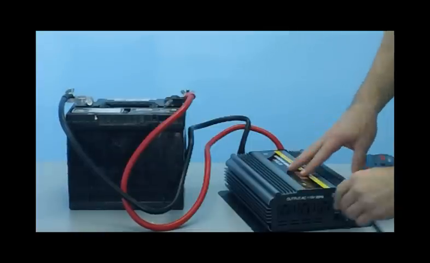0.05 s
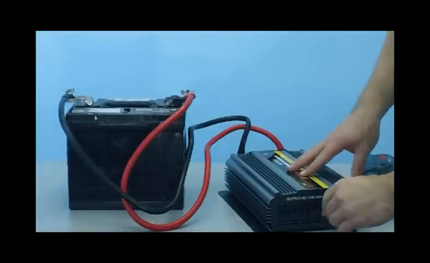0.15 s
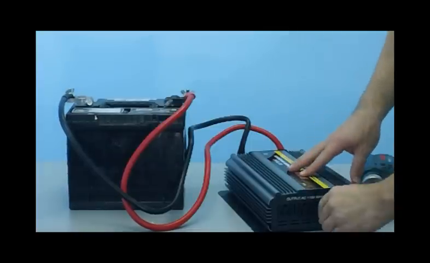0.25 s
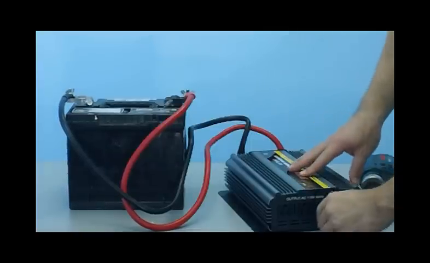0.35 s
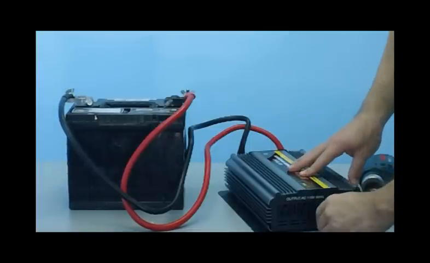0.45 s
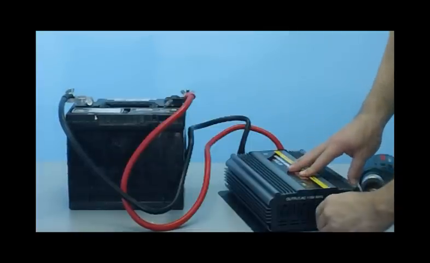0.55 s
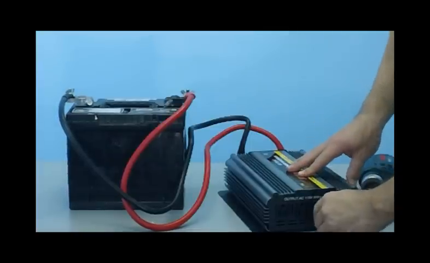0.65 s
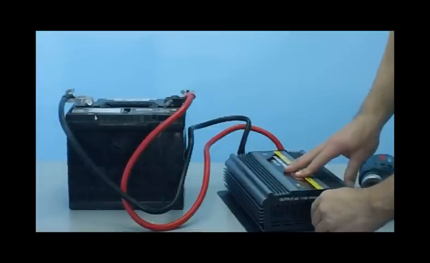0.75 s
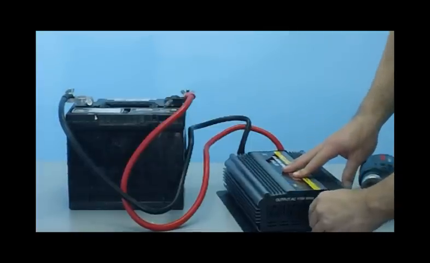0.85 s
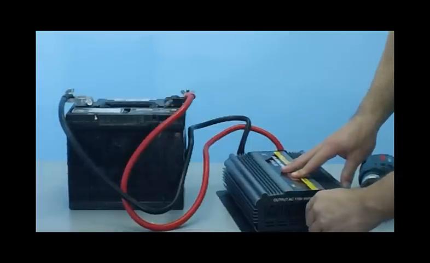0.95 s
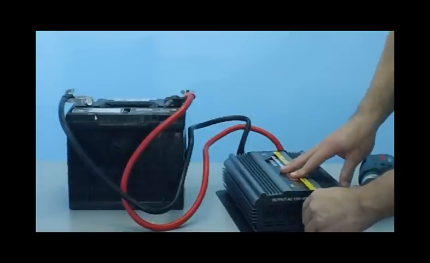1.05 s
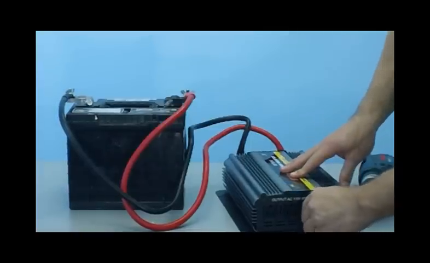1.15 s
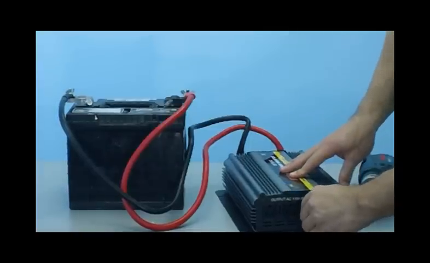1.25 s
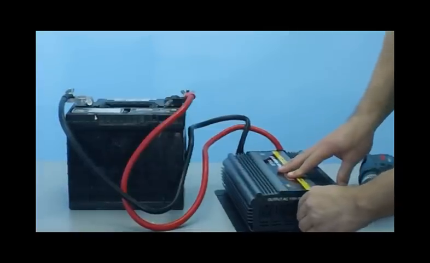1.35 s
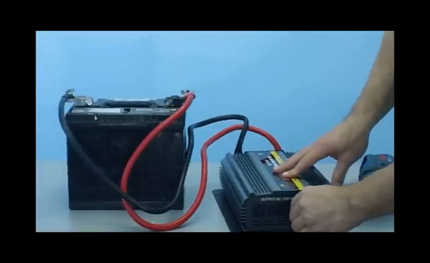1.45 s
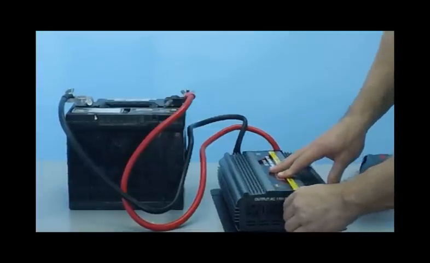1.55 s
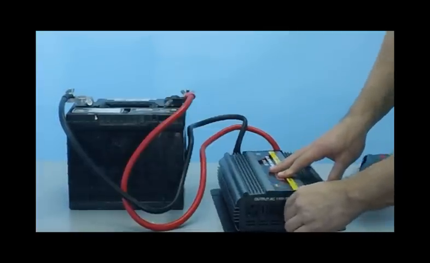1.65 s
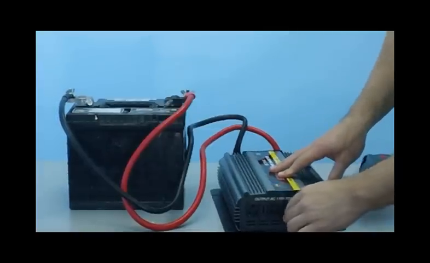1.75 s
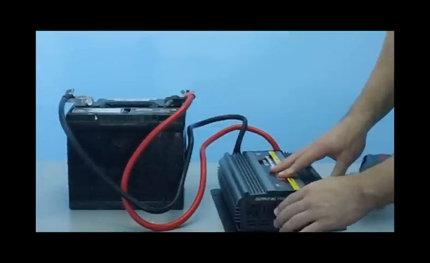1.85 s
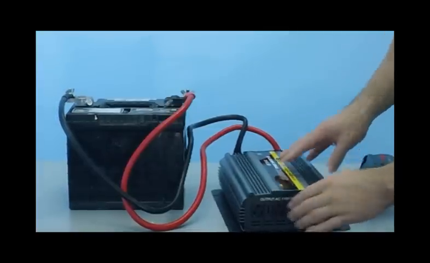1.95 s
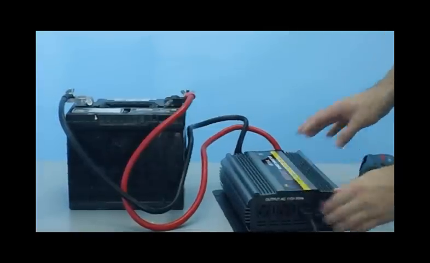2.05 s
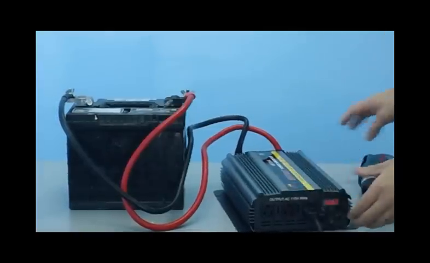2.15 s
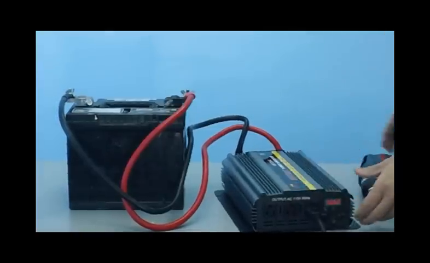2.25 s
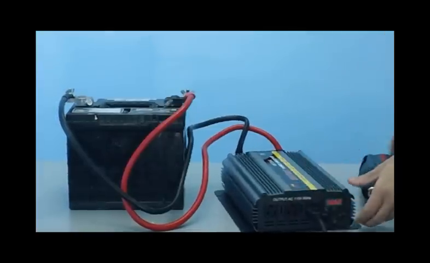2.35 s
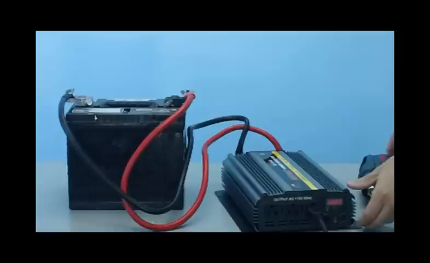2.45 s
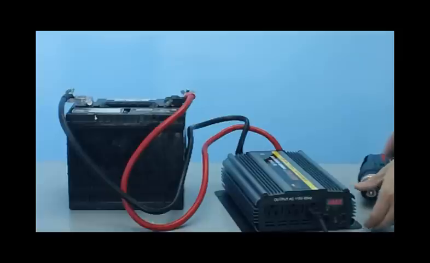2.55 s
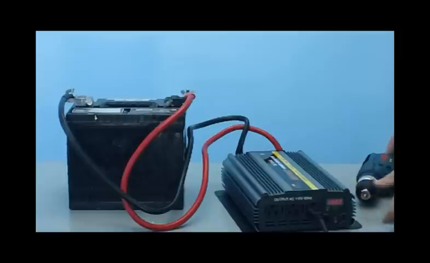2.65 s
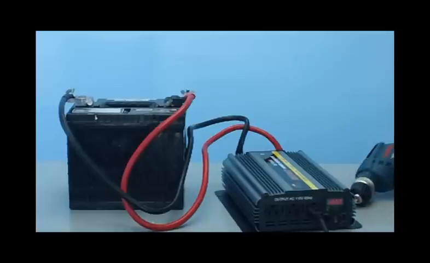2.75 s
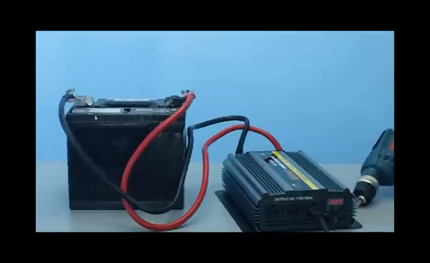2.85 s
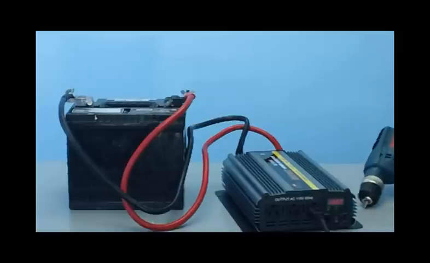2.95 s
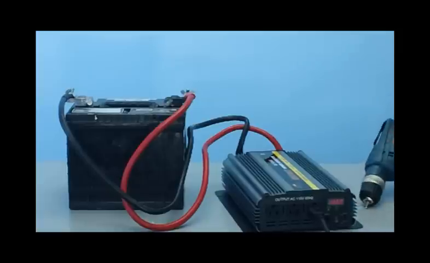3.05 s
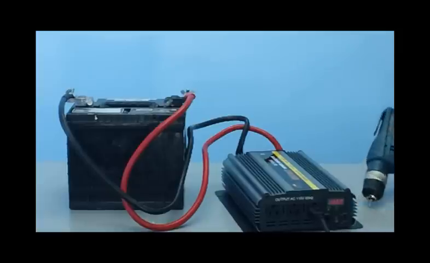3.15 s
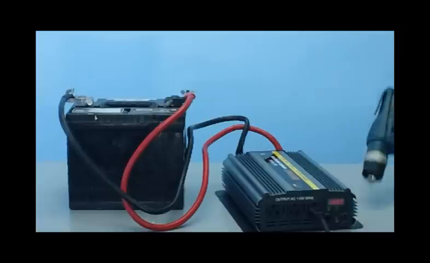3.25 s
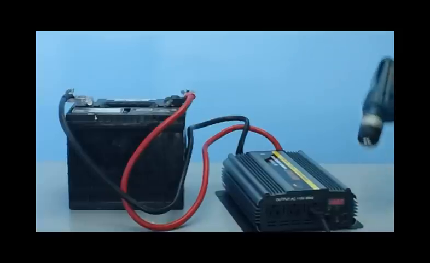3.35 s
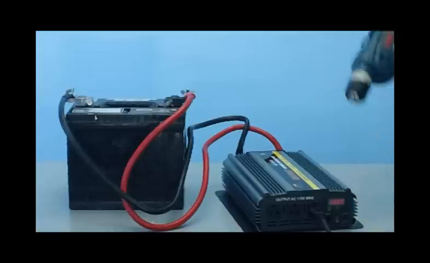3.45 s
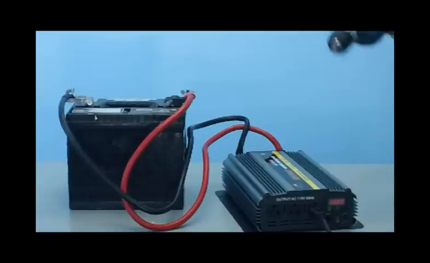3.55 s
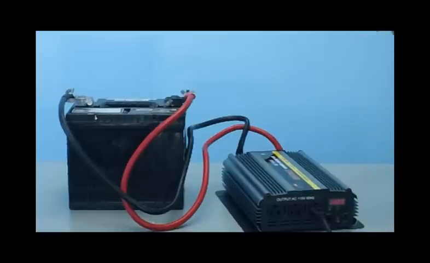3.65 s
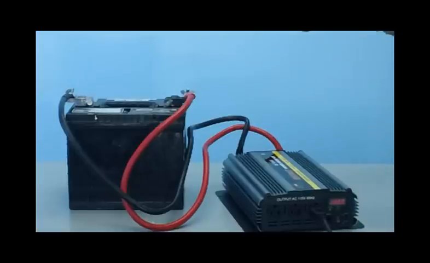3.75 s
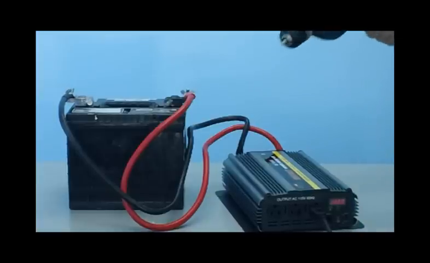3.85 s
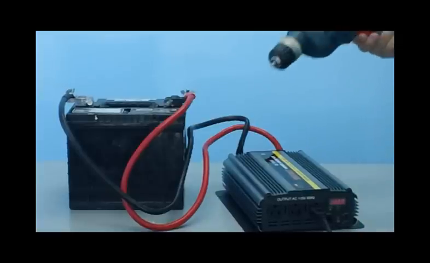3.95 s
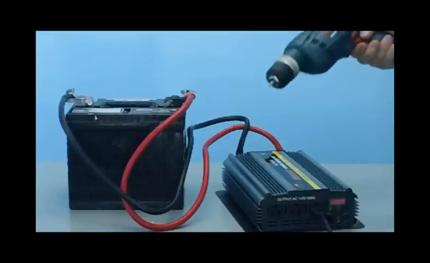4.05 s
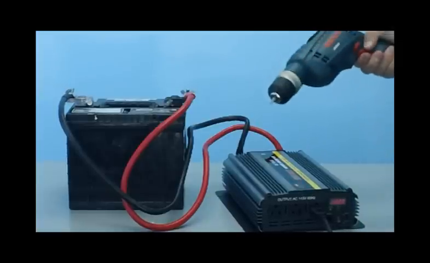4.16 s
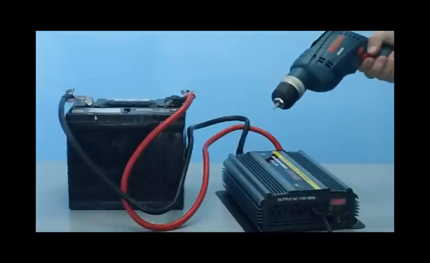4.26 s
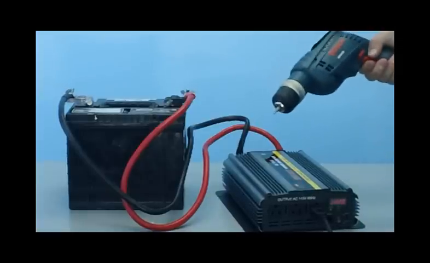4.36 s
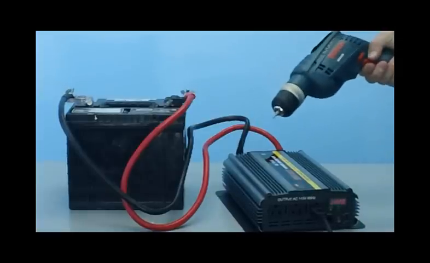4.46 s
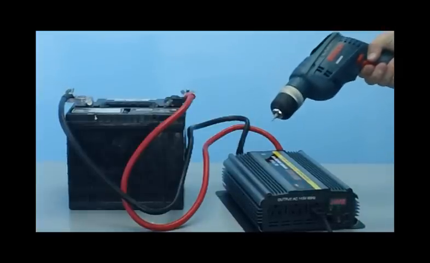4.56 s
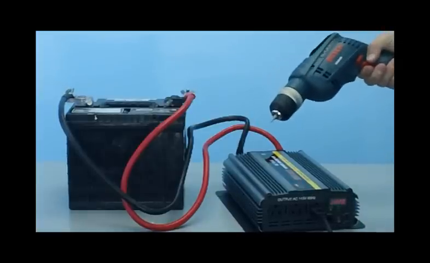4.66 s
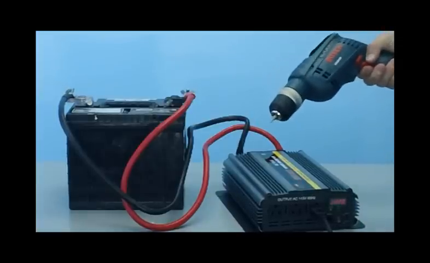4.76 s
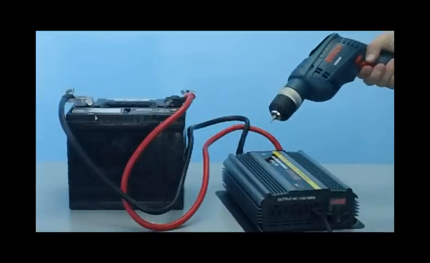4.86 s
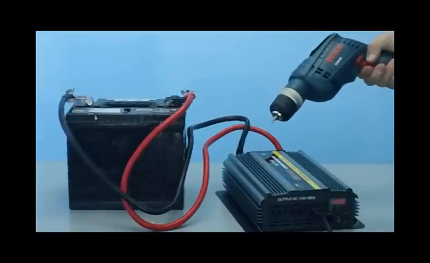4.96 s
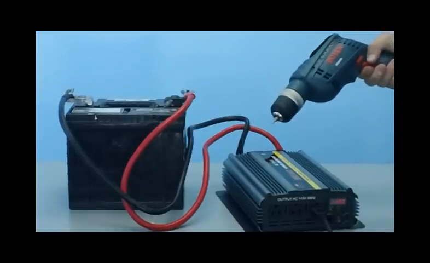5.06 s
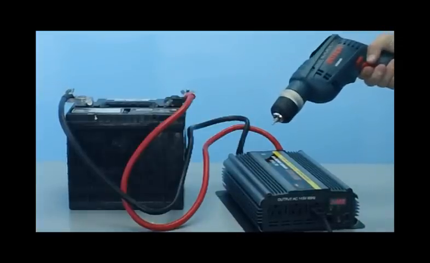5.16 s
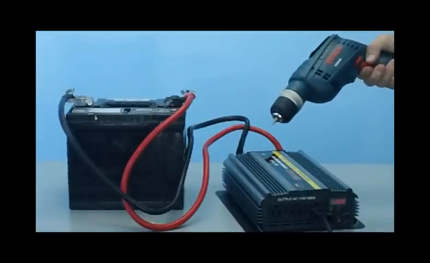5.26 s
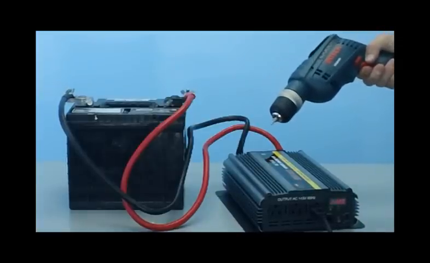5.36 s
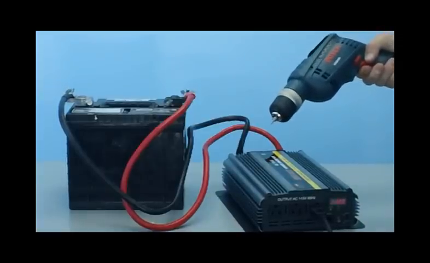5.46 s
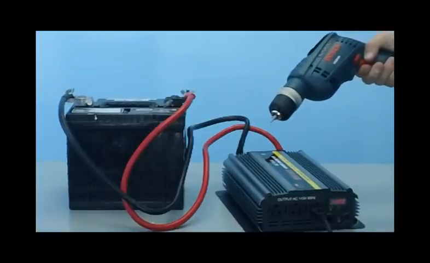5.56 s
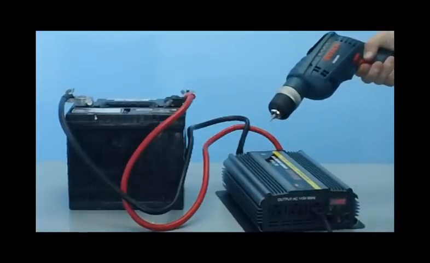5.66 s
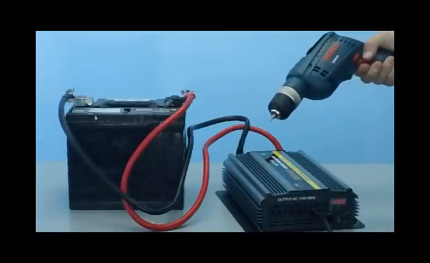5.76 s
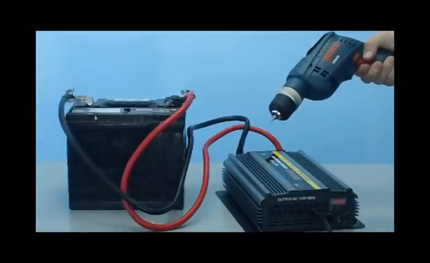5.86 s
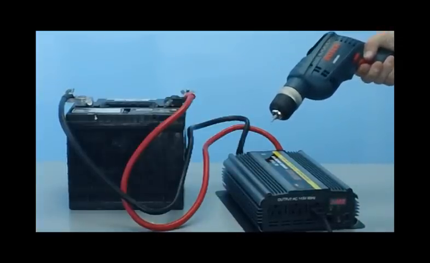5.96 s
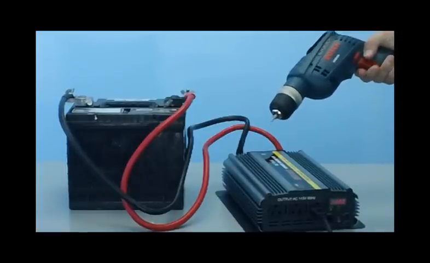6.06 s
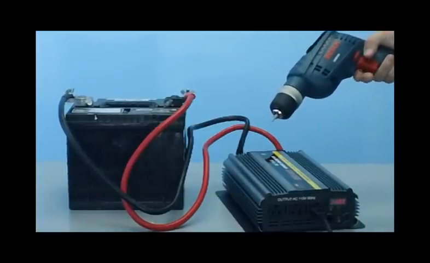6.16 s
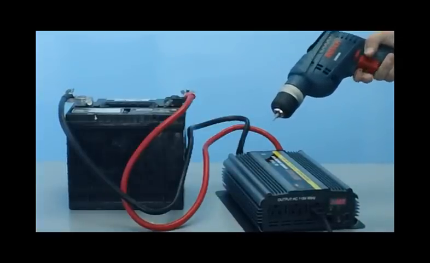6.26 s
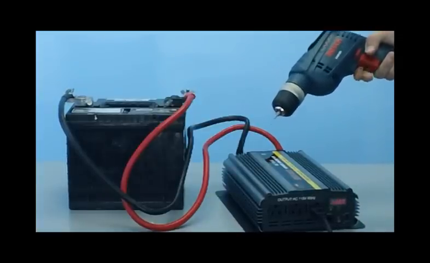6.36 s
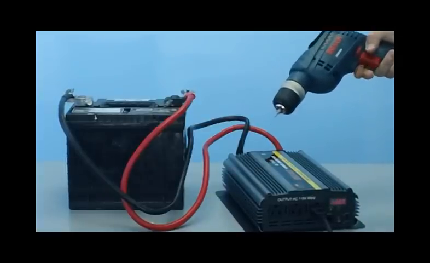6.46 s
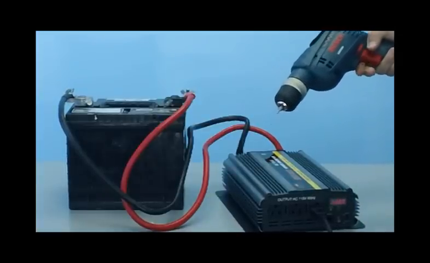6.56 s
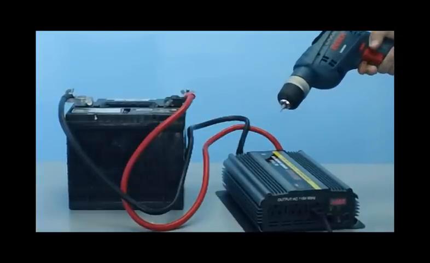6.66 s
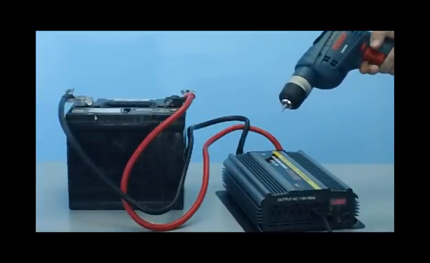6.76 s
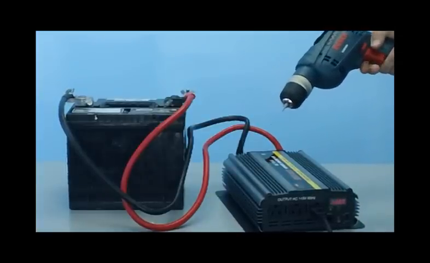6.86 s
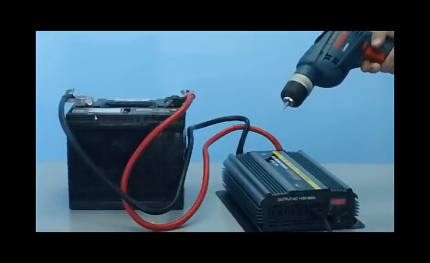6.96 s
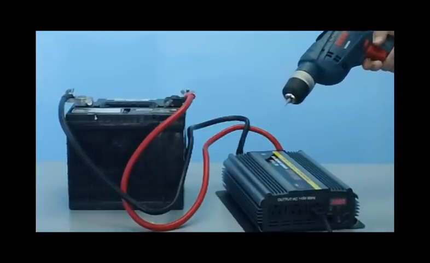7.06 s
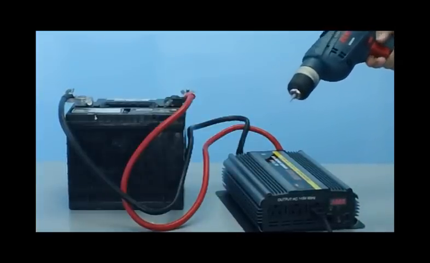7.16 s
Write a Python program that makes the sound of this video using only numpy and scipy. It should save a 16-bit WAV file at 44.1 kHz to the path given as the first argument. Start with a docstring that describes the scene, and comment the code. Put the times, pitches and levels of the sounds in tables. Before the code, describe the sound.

Faint steady room air with sliding hands, light clicks and woody knocks as a device and drill are handled on a table. After one strong clunk and a short pause, the drill rasps haltingly, sweeps upward within half a second and runs at full speed, bright and airy with a high whine. It begins slowing at the end. Close, centred pickup with a short room reflection.

```python
"""Quiet room air and rubbing hands come first, then knocks as a corded drill is handled on a table.
Its motor stutters on the first current pulses, races up with a rising whine, roars and starts to coast down.
Table modes and plastic clicks make the knocks; shaped noise makes the rubbing, rasp, roar and fan hiss.
The whine, gear mesh and shaft hum follow the turning rotor. A small hard room answers the knocks and drill.
Both channels carry the same sound, with a trace of opposite-sign hiss in each."""
import sys
import numpy as np
from scipy import signal
from scipy.fft import rfft, irfft, next_fast_len
from scipy.io import wavfile
from scipy.ndimage import uniform_filter1d, map_coordinates

SR = 44100
rng = np.random.default_rng(int(sys.argv[2]) if len(sys.argv) > 2 else 0)


def waveform_to_disk(signal):
    """Save audio, clipped to [-1, 1], as 16-bit WAV at the path in sys.argv[1]."""
    frames = np.transpose(np.atleast_2d(signal))
    scaled = np.clip(frames, -1, 1) * 32767
    samples = np.round(scaled).astype(np.int16)
    wavfile.write(sys.argv[1], SR, samples)


N = 317597  # samples

# Steady room air, relative spectrum: f/Hz, level/dB
AIR_SPECTRUM = [(15, -47), (25, -14.5), (86, 1), (258, 0), (594, -6.5), (679, -13), (913, -12), (2270, -22),
                (8480, -26), (11100, -27.5), (12300, -29), (13700, -28), (15300, -27)]
# Small hard room, decay by frequency: f/Hz, t60/s
ROOM_DECAY = [(150, 0.53), (800, 0.31), (2000, 0.34), (5000, 0.19), (12000, 0.24)]
# Longer hand slides: centre t/s, bell half width/s, lift/dB
STROKES = [(0.802, .15, 3), (1.515, 0.11, 9), (2.1, 0.11, 1.5), (2.665, 0.072, 4.5)]
# Contacts: t/s, deep, middle, hollow and plastic click level/dB, hardness/0-1
KNOCKS = [(0.414, -35, -40, -50, -34, 0.1), (0.455, -32.5, -26.5, -31, -16, 0),
          (0.575, -38, -36, -35, -32, .1), (0.619, -35, -35, -35, -27.5, .1),
          (0.909, -37.5, -43, -41, -36, 0.1), (1.049, -41.5, -52, -54, -42.5, 1),
          (1.199, -39, -35, -34.5, -38, 0.3), (1.216, -33, -35, -39, -19.5, 0.13),
          (1.254, -24, -33, -25, -21.5, 0.94), (1.275, -44, -39, -41, -27, 0.1),
          (1.51, -35, -38, -42.5, -39, 0.4), (1.539, -32.5, -40, -45, -37, 0.4),
          (1.782, -36, -42, -37.5, -28, 0.08), (2.629, -35.5, -41, -41, -36, 0),
          (2.733, -40, -43, -44, -50, 0.8), (2.771, -13, -18, -13, -12, 0.47),
          (3.029, -50, -50, -59, -48, .9), (3.138, -30, -30.5, -32, -28.5, 0.4),
          (3.152, -32, -27, -34, -34, 0.05)]
# Ringing modes of the table top: f/Hz, level/dB, t60/s
TABLE_MODES = [(239, -8, 0.029), (284, -4, 0.091), (314, -0.5, 0.091), (384, -1.5, 0.085),
               (496, -0.5, 0.07), (579, -4, 0.076), (699.5, 1, 0.071), (763, -1.5, 0.061), (894, -2, 0.068),
               (932, -13.5, 0.066), (1273, -4.5, 0.031)]
# The table rocking on its legs: t/s, level/dB
JOLTS = [(0.575, -24), (0.619, -28.5), (1.216, -33), (1.507, -26), (2.629, -20), (2.734, -36),
         (2.771, -9.5), (3.139, -31)]
# Modes of the table on its legs: f/Hz, level/dB, t60/s
LEG_MODES = [(115.6, -1.5, 0.14), (181.9, -19, 0.39)]
# Current pulses in the rush of the motor: t/s, depth/0-1
STUTTER = [(3.9, 0.36), (4, 0.3), (4.05, 0.6), (4.11, 0.44), (4.16, 0.13), (4.4, 0.12)]
# Brushes scraping on the slow rotor, relative level: t/s, level/dB
RASP_LEVEL = [(3.899, -40.5), (3.97, -37.5), (4.04, -37.5), (4.1, -29.5), (4.16, -64)]
# Resonances of the brush scrape: f/Hz, width/Hz, level/dB
RASP_MODES = [(1040, 410, 6.5), (2300, 900, -6), (3750, 1100, 0), (4940, 150, 8), (5400, 520, -4)]
# Motor roar before the steady resonances, relative spectrum: f/Hz, level/dB
ROAR_SPECTRUM = [(88, -69), (150, -27), (183, -26), (314, -10.5), (414, -13), (454, -6.5), (739, -5.5),
                 (1570, 0), (3500, -6.5), (4550, -9.5), (7700, -120)]
# Fan hiss before the steady resonances, relative spectrum: f/Hz, level/dB
HISS_SPECTRUM = [(2000, -39), (3200, 1), (4600, 4.5), (6500, 2.5), (9500, 4.5), (11500, 3.5), (13500, 2.5),
                 (15300, 1.5)]
# Steady resonances colouring the drill noise: f/Hz, width/Hz, lift/dB
STEADY_MODES = [(660, 12, 3), (834, 12, 2.5), (930, 90, 2.5), (1215, 16, 10.5), (1430, 10, 2),
                (1570, 10, 4.5), (1750, 20, 5.5), (2073, 47, 4.5), (2244, 170, 4.5), (2666, 280, 5.5),
                (4470, 80, 3), (4690, 150, 3)]
# Slight wavering of the running drill's level: t/s, level/dB
HELD_LEVEL = [(4.3, 0), (4.6, 0), (5.05, 1), (5.4, 0), (5.9, -.5), (6.14, 0.6), (6.5, 0), (7.2, 1)]

# Room air sinks under sound above the knee; the level follower has time constant DUCK_S in seconds
AIR_DB, DUCK_KNEE_DB, DUCK_SLOPE, DUCK_S = -45.5, -30, 0.63, 0.22
RUB_DB, RUSTLE_DB = -52, -60.5  # hands and cable stirring, before strokes
SOFT_CLICK_HZ, HARD_CLICK_HZ = 1270, 3800
SOFT_TICK_DB, HARD_TICK_DB = -26, -6  # high tick relative to the click
TOUCH_S, START_S, RELEASE_S = 3.899, 4.048, 6.308  # first current, run-up, start of the coast
FULL_RPS, CREEP_RPS = 455, 50  # turns a second
SPIN_UP_S, COAST_S = 0.149, 1.565  # time constants
# The finger eases off before the rotor slows; CREEP_CURRENT is the share of full current at first touch
EASE_S, CREEP_CURRENT, TOUCH_RISE_S = 0.21, 0.62, 0.0056
MAINS_HZ, BARS, MESH_TEETH = 60, 36, 11  # bars and teeth: cycles a turn
# Relative level/dB at full speed, exponent of growth with speed,
# lift/dB when straining from rest, drop/dB without current
ROAR_LAW, HISS_LAW = (-24, 1, 10.5, 0.5), (-16.5, 1.7, 10, 2)
WHINE_LAW, MESH_LAW = (-14.5, 1.7, -4, 0.5), (-37, 0.6, 24, 14)
TONES_IN_S, TONES_RISE_S = 4.09, 0.04
HUM_DB, HUM_SWELL = -52, (5.23, 0.3, 13)  # one swell: centre t/s, bell half width/s, lift/dB
TOP_HZ, NOTCH_HZ = 15340, 12520


def amp(db):
    """dB to gain."""
    return 10 ** (np.asarray(db) / 20)


def unit(x):
    """Level a sound to rms 1."""
    return x / np.sqrt(np.mean(x ** 2) + 1e-20)


def along(points, hz):
    """Read a curve of (f/Hz, value) points on a log frequency axis."""
    f, v = np.transpose(points)
    return np.interp(np.log(hz + 1), np.log(f + 1), v)


def curves(rows):
    """Draw one automation curve for each column after the time."""
    s, *cols = np.transpose(rows)
    return [np.interp(np.arange(N) / SR, s, c) for c in cols]


def swell(centre_s, half_s, db):
    """A bell-shaped lift in dB."""
    return db * np.exp(-((np.arange(N) / SR - centre_s) / half_s) ** 2)


def wobble(rate):
    """A smooth random curve, rate knots a second."""
    knots = rng.standard_normal(int(N * rate / SR) + 4)
    return map_coordinates(knots, [np.arange(N) * rate / SR])


def filtered(x, response):
    """Shape a sound by a complex response of frequency."""
    m = next_fast_len(x.shape[-1] + 8192)
    spectrum = rfft(x, m) * response(np.fft.rfftfreq(m, 1 / SR))
    return irfft(spectrum, m)[..., :x.shape[-1]]


def band(f, hz, width_hz):
    """One causal resonance."""
    return 1j * f * width_hz / (hz * hz - f * f + 1j * f * width_hz)


def noise(response, patchy_db):
    """Coloured noise of rms 1, mottled by random gain over time and frequency."""
    z = signal.stft(rng.standard_normal(N), nperseg=512)[2]
    field = uniform_filter1d(rng.standard_normal(z.shape), 6, 0)
    field = uniform_filter1d(field, 10, 1)
    patchy = signal.istft(z * amp(patchy_db * unit(field)), nperseg=512)[1][:N]
    return unit(filtered(patchy, response))


def echoes():
    """A fresh room tail of energy 1; each frequency dies at its own speed."""
    hz, t, z = signal.stft(rng.standard_normal(SR // 2), SR, nperseg=256)
    decay = amp(-60 * t / along(ROOM_DECAY, hz)[:, None])
    tail = signal.istft(z * decay, SR, nperseg=256)[1]
    return np.pad(tail / np.linalg.norm(tail), (300, 0))  # short delay before the tail


def background(near):
    """Steady room air that sinks while the near sounds are loud."""
    keep = np.exp(-1 / (DUCK_S * SR))
    power = signal.lfilter([1 - keep], [1, -keep], near ** 2)
    duck = (1 + power / amp(DUCK_KNEE_DB) ** 2) ** (-DUCK_SLOPE / 2)
    return amp(AIR_DB) * duck * noise(lambda f: amp(along(AIR_SPECTRUM, f)), patchy_db=1.0)


def scuffs():
    """Sliding hands excite the table's modes in lumps, with a dry rustle above, until the drill starts."""
    lift_db = sum(swell(*row) for row in STROKES)
    busy = np.arange(N) < TOUCH_S * SR

    def wood(f):
        """A broad woody body plus the table modes."""
        modes = sum(amp(db) * band(f, hz, 41) for hz, db, t60 in TABLE_MODES)
        return 0.64 * band(f, 420, 750) + modes

    rub = unit(amp(1.05 * wobble(29.56)) * noise(wood, patchy_db=2.0))
    dry_rustle = noise(lambda f: band(f, 1860, 2800) ** 2, patchy_db=5.0)
    rustle = unit(amp(2 * wobble(60)) * dry_rustle)
    return busy * (amp(RUB_DB + lift_db) * rub + amp(RUSTLE_DB + 0.41 * lift_db) * rustle)


def knocks():
    """Contacts ring the table and click the plastic, brighter when hard; jolts thump; the room answers."""
    out, t = np.zeros(N + 2 * SR), np.arange(SR // 4) / SR

    def mode(hz, db, t60):
        """A dying sine, its level varied a little at random."""
        return amp(db + 2 * rng.normal() - 60 * t / t60) * np.sin(2 * np.pi * hz * t)

    def burst(t60, hz, width_hz):
        """A dying noise burst through a steep resonance."""
        raw = amp(-60 * t / t60) * rng.standard_normal(len(t))
        return filtered(raw, lambda f: band(f, hz, width_hz) ** 3)

    hits = []
    for s, deep_db, middle_db, hollow_db, click_db, hard in KNOCKS:
        wood = 0
        for hz, db, t60 in TABLE_MODES:
            group_db = deep_db if hz < 440 else middle_db if hz < 640 else hollow_db
            wood = wood + mode(hz, db + group_db, t60)
        click_hz = SOFT_CLICK_HZ * (HARD_CLICK_HZ / SOFT_CLICK_HZ) ** hard
        tick_db = SOFT_TICK_DB + (HARD_TICK_DB - SOFT_TICK_DB) * hard
        click = burst(0.047, click_hz, 1.7 * click_hz) + amp(tick_db) * burst(0.02, 6000, 12000)
        hits.append((s, wood * (1 - np.exp(-t / 0.0023)) + amp(click_db) * click))
    for s, db in JOLTS:
        thump = sum(mode(*row) for row in LEG_MODES)
        hits.append((s, amp(db) * thump * (1 - np.exp(-t / 0.03))))  # soft onset
    for s, hit in hits:
        wet = amp(1.0) * signal.fftconvolve(hit, echoes())
        out[round(s * SR):][:len(hit)] += hit
        out[round(s * SR):][:len(wet)] += wet
    return out[:N]


def rotor():
    """Turns a second: a creep, an exponential run-up and coast; and the share of full current."""
    t = np.arange(N) / SR
    run_up = FULL_RPS * (1 - np.exp(-np.maximum(t - START_S, 0) / SPIN_UP_S))
    coast = np.exp(-np.maximum(t - RELEASE_S, 0) / COAST_S)
    speed = np.maximum(run_up, CREEP_RPS) * coast
    eased = np.clip(0.5 + (RELEASE_S - t) / EASE_S, 0, 1)
    return speed, np.where(t < START_S, CREEP_CURRENT, eased)


def drill():
    """Brush rasp, roar and fan hiss pulsed by the mains, with tones locked to the shaft."""
    speed, current = rotor()
    depth = np.clip(curves(STUTTER)[0], 0, 1)
    share, held_db = speed / FULL_RPS, curves(HELD_LEVEL)[0]
    turns, t = np.cumsum(speed) / SR, np.arange(N) / SR - TOUCH_S

    def law(db, growth, strain_db, drop_db):
        """Gain of one layer from speed and current."""
        strain = strain_db * current * (1 - share)
        return amp(db + held_db + strain - drop_db * (1 - current)) * share ** growth

    def colour(f):
        """Lift of the steady resonances."""
        return amp(sum(db * np.abs(band(f, hz, w)) ** 2 for hz, w, db in STEADY_MODES))

    def scrape(f):
        """Brush resonances in alternating polarity."""
        return sum(amp(db) * band(f, hz, w) * (-1) ** k for k, (hz, w, db) in enumerate(RASP_MODES))

    def tone(k, scatter, swing_db, rate):
        """k cycles a turn, with unsteady phase and level."""
        phase = 2 * np.pi * k * turns + scatter * wobble(300)
        return amp(swing_db * wobble(rate)) * np.sin(phase)

    on = np.clip(t / TOUCH_RISE_S, 0, 1)
    pulse = np.exp(-(t * MAINS_HZ % 1) / 0.23)  # one decaying surge each mains cycle
    kick = unit(1 - depth + 1.97 * depth * pulse)
    rasp = amp(curves(RASP_LEVEL)[0]) * noise(scrape, patchy_db=-2.0)
    roar = noise(lambda f: amp(along(ROAR_SPECTRUM, f)) * colour(f), patchy_db=0.1)
    roar = roar * amp(0.096 * wobble(17))
    hiss = noise(lambda f: amp(along(HISS_SPECTRUM, f)) * colour(f), patchy_db=0.65)
    hiss = hiss * amp(0.36 * wobble(11))
    rush = on * kick * (law(*ROAR_LAW) * roar + law(*HISS_LAW) * hiss + rasp)
    rush_wet = amp(-8) * signal.fftconvolve(rush, echoes())[:N]  # the room combs the steady noise

    whine = tone(BARS, 0.64, 3.8, 85)
    mesh = tone(MESH_TEETH, 0.68 + 1.1 * share, 3.0, 60)  # uneven teeth blur it, more so at speed
    hum_gain = amp(HUM_DB + swell(*HUM_SWELL) + 4.8 * wobble(8.5))
    shaft = hum_gain * np.sin(2 * np.pi * turns + 1.1 * wobble(25))
    rise = np.clip((t + TOUCH_S - TONES_IN_S) / TONES_RISE_S, 0, 1) ** 2
    tones = rise * (law(*WHINE_LAW) * whine + law(*MESH_LAW) * mesh + shaft)
    tones_wet = amp(-8.0) * signal.fftconvolve(tones, echoes())[:N]
    return amp(-1.0) * (rush + rush_wet) + tones + tones_wet


def scene():
    """All sources sum into one signal, the same in both channels."""
    near = knocks() + scuffs() + drill()
    mono = near + background(near)
    return np.array([mono, mono])


def record(dry):
    """Faint hiss of opposite sign in the channels, weak deep bass, a deep treble notch and a band limit."""
    level = np.sqrt(np.abs(uniform_filter1d(dry[0] ** 2, size=2048)))
    own = amp(-58) * noise(lambda f: 4.8 + band(f, 200, 410), patchy_db=2)
    own = own / (1.5 + (level / 0.013) ** 4)  # fades away under loud sound

    def response(f):
        """Bass roll-off, treble notch with an empty floor, and top edge."""
        bass = 1j * f / (45 + 1j * f)
        notch = 1 - band(f, NOTCH_HZ, 3700)
        gap = np.clip((np.abs(f - NOTCH_HZ) - 70) / 80, 0, 1) ** 2
        edge = np.cos(np.pi / 2 * np.clip((f - TOP_HZ) / 200 + 0.75, 0, 1)) ** 2
        return bass * notch * gap * edge

    return filtered(dry + own * np.array([[1], [-1]]), response)


dry = scene()
out = record(dry)
waveform_to_disk(out)
```